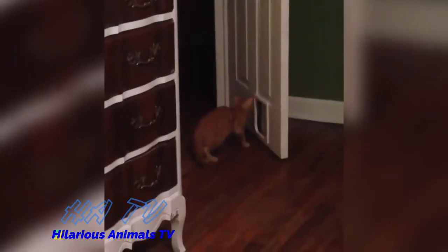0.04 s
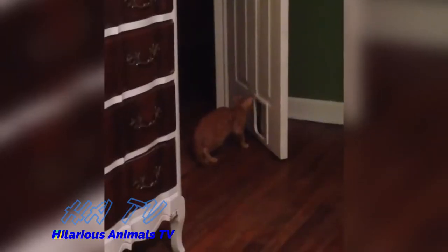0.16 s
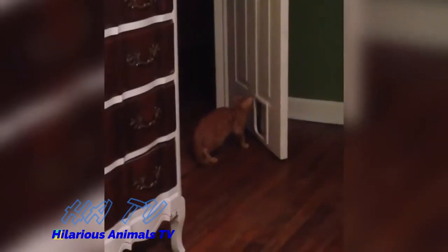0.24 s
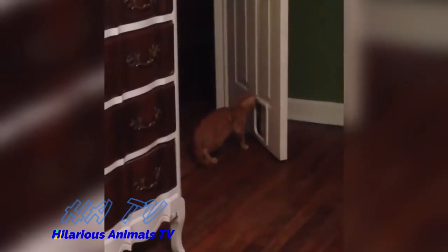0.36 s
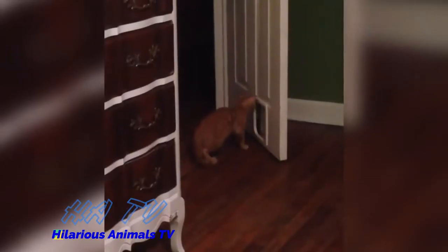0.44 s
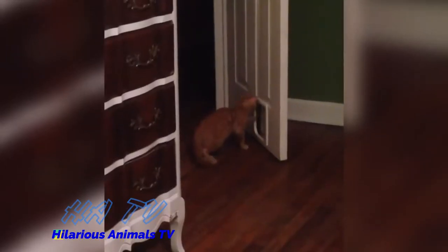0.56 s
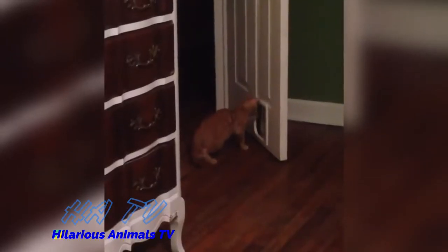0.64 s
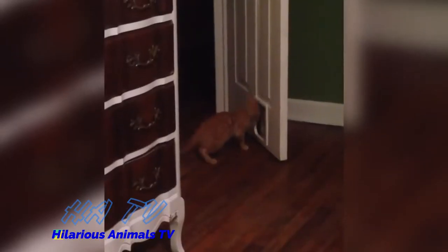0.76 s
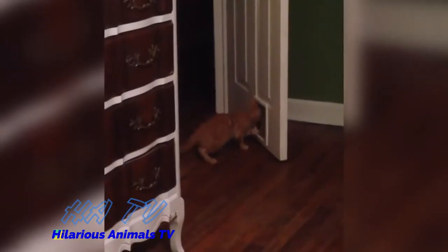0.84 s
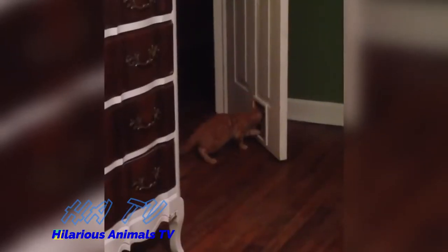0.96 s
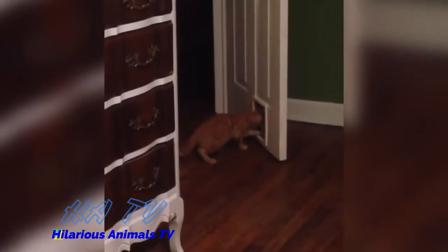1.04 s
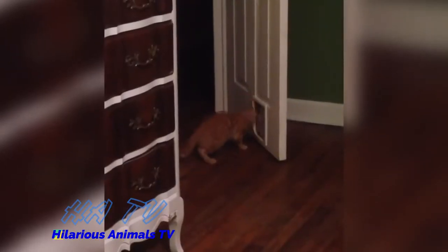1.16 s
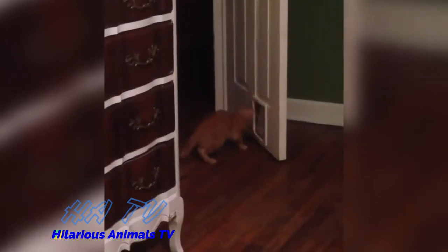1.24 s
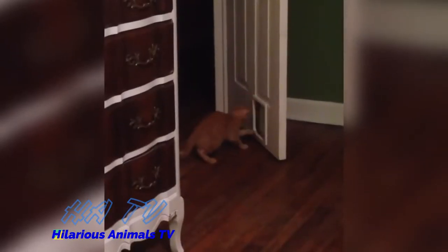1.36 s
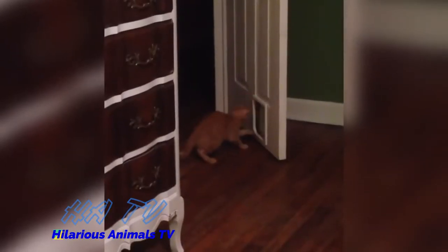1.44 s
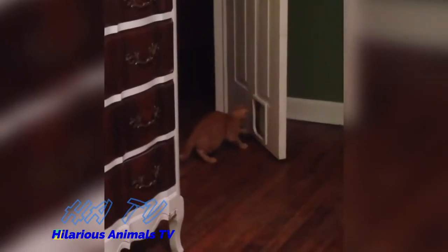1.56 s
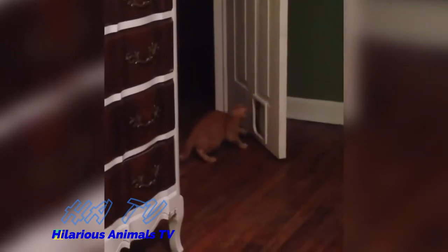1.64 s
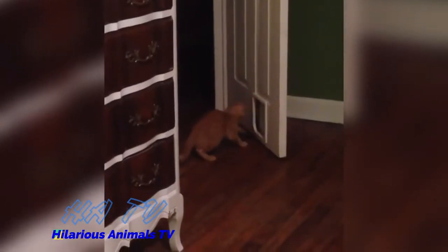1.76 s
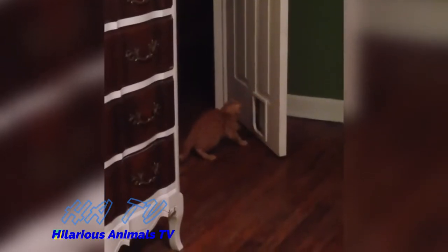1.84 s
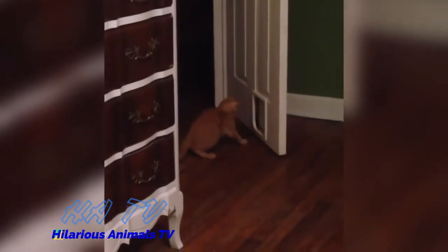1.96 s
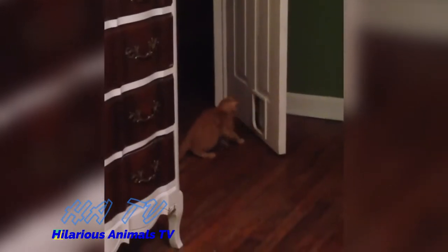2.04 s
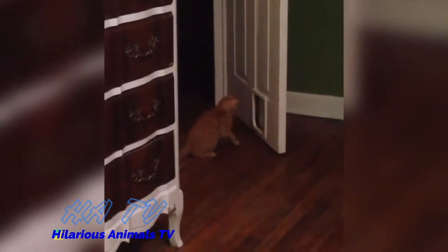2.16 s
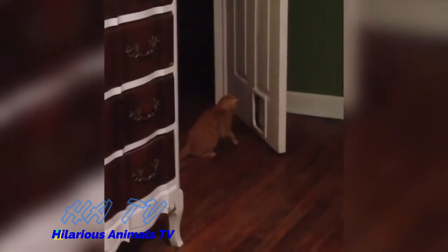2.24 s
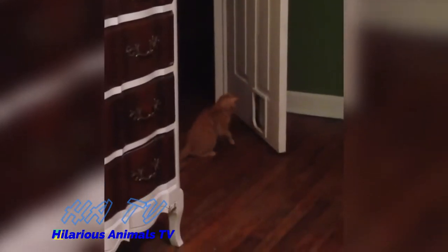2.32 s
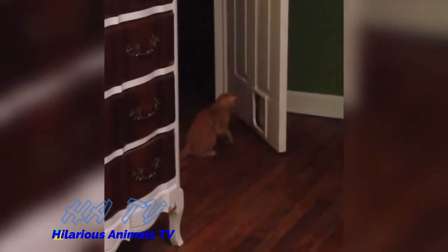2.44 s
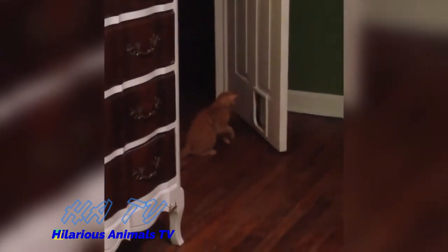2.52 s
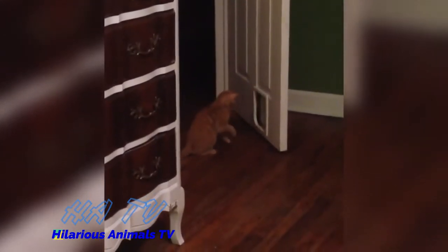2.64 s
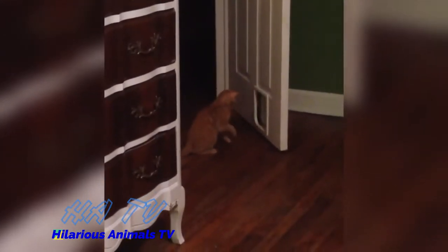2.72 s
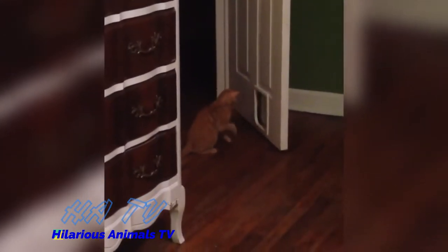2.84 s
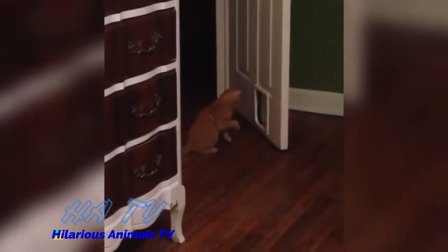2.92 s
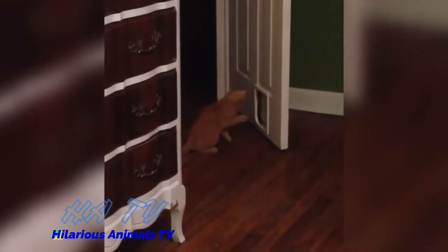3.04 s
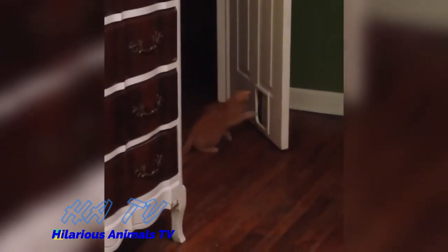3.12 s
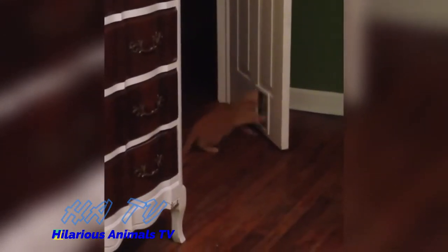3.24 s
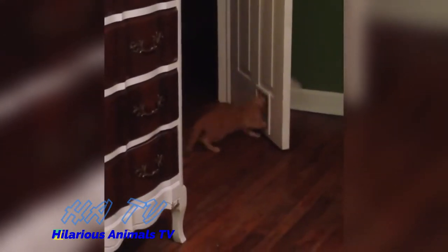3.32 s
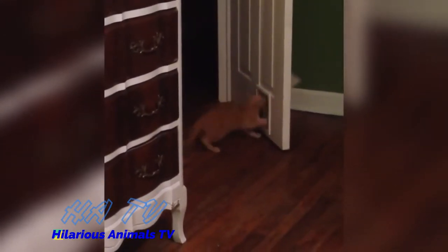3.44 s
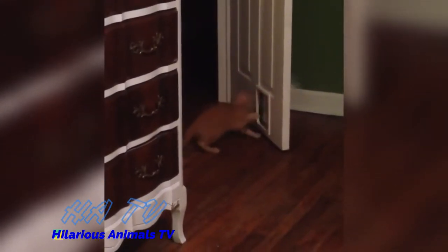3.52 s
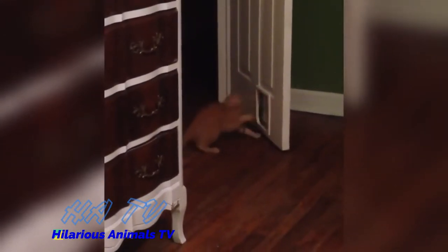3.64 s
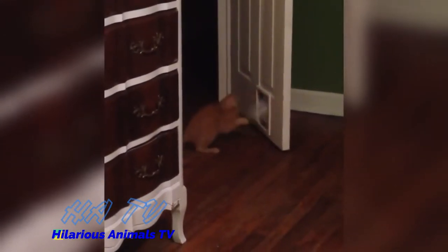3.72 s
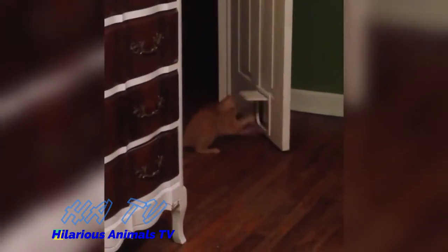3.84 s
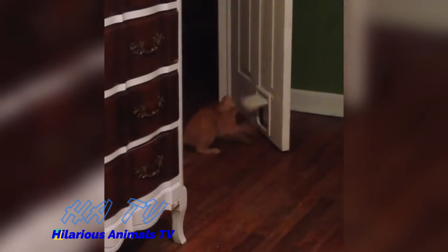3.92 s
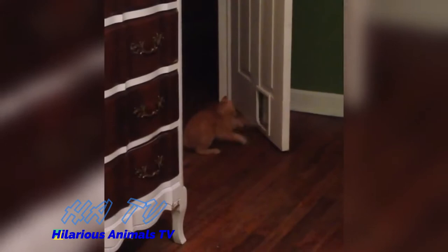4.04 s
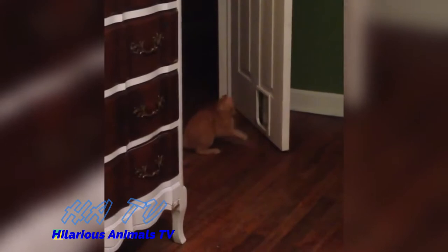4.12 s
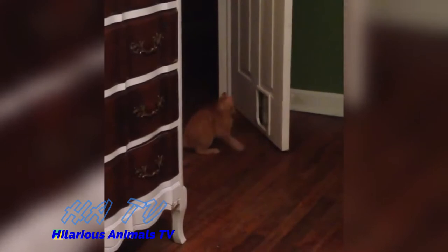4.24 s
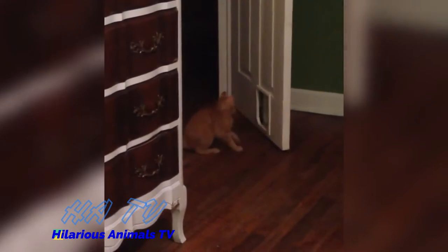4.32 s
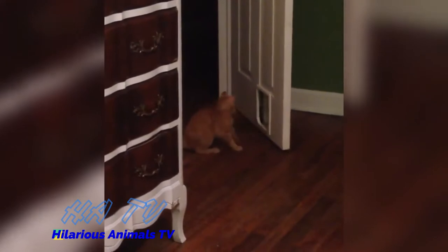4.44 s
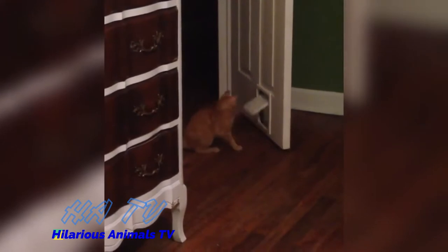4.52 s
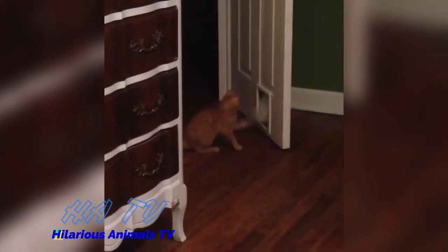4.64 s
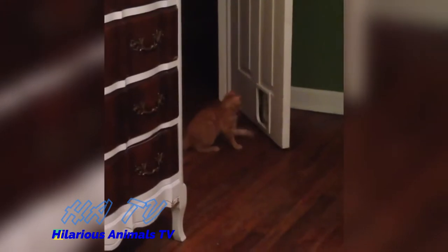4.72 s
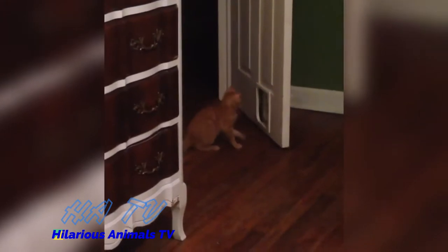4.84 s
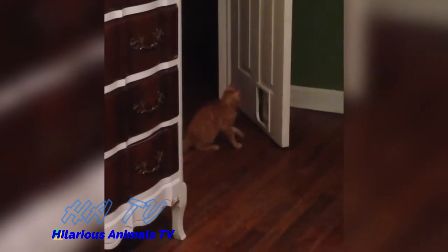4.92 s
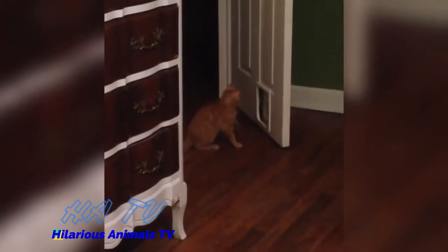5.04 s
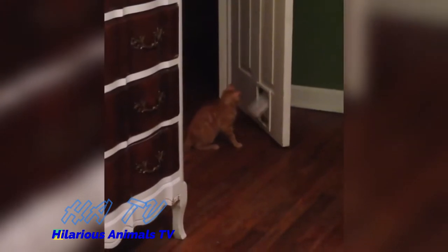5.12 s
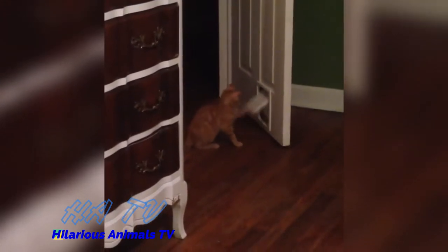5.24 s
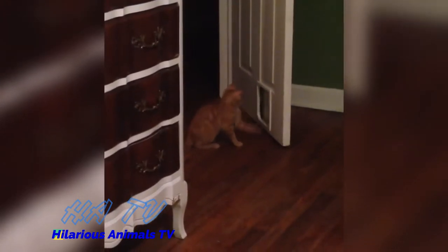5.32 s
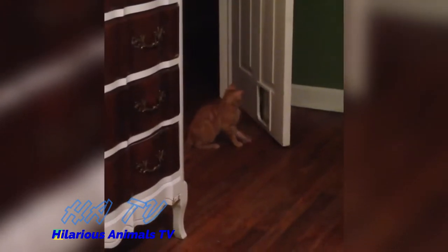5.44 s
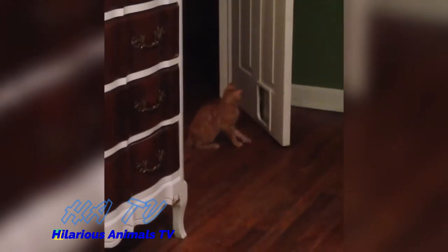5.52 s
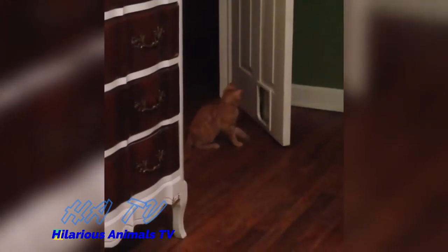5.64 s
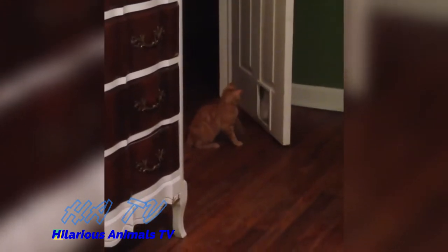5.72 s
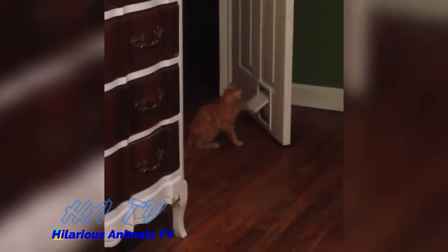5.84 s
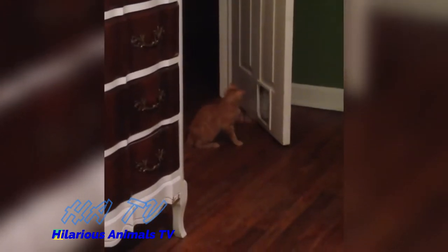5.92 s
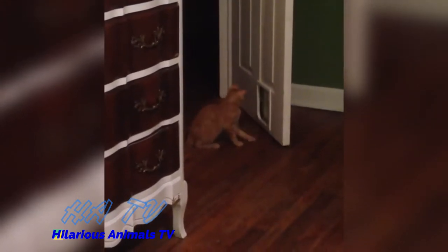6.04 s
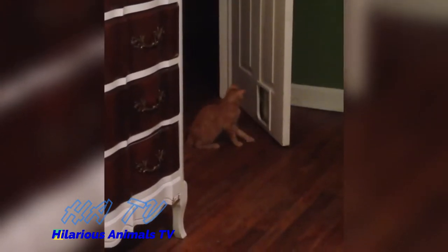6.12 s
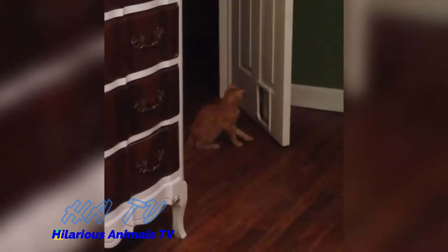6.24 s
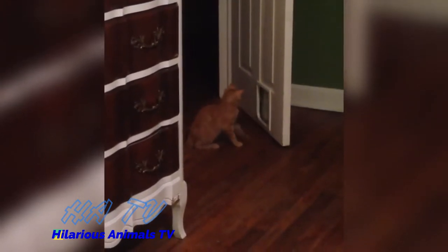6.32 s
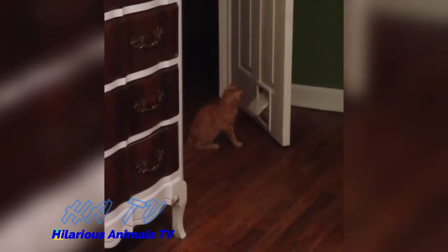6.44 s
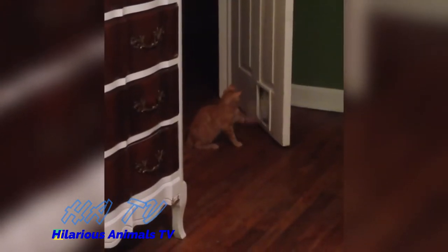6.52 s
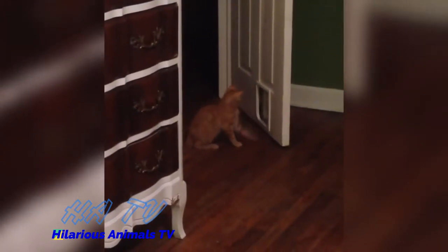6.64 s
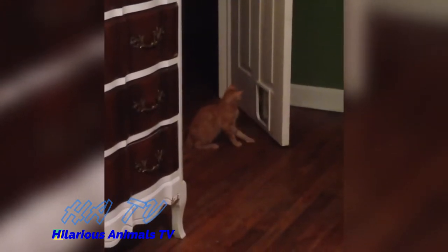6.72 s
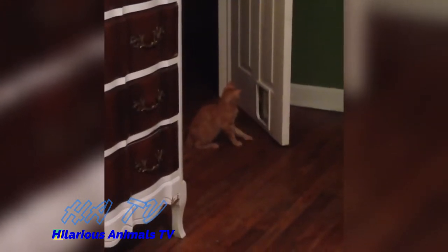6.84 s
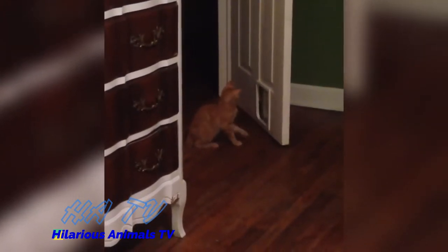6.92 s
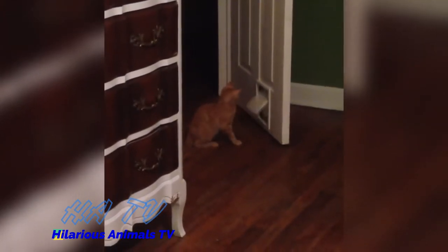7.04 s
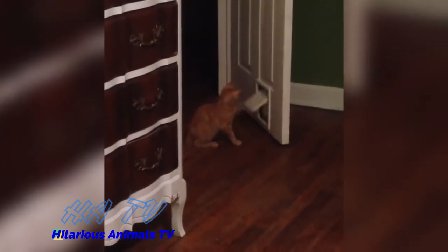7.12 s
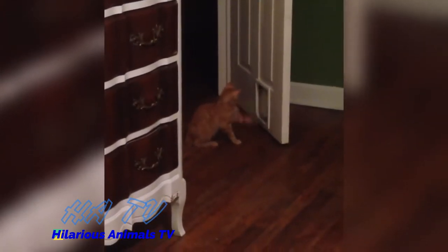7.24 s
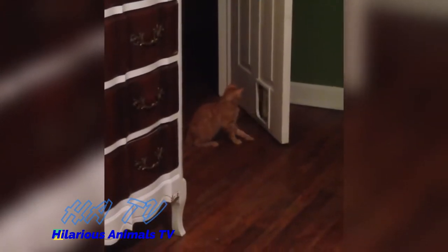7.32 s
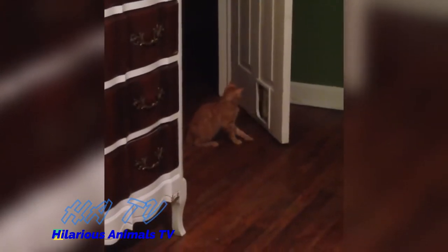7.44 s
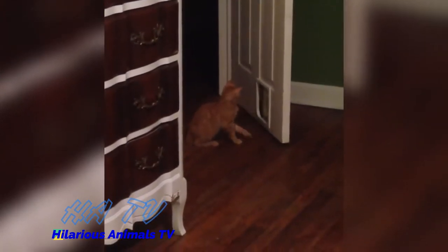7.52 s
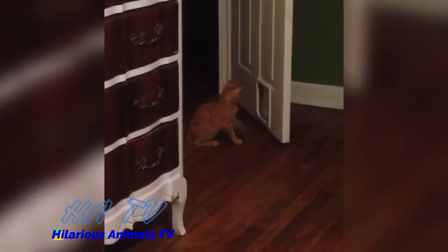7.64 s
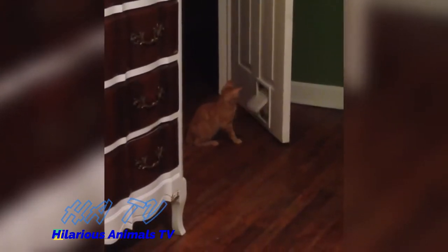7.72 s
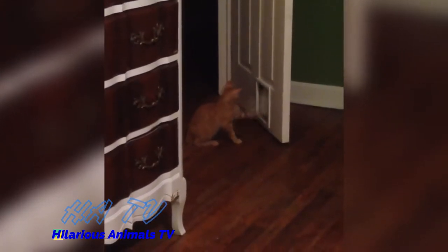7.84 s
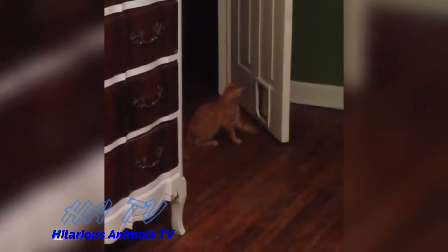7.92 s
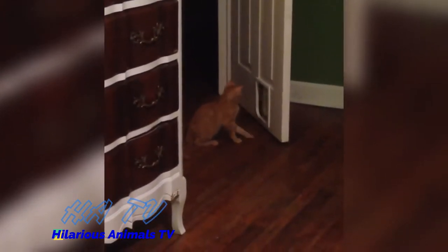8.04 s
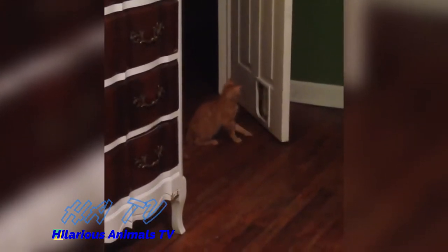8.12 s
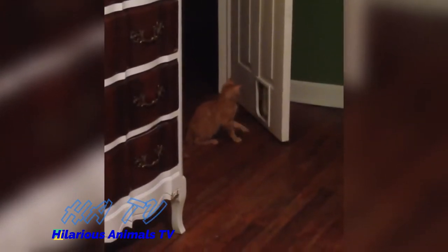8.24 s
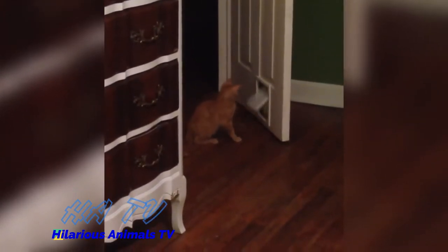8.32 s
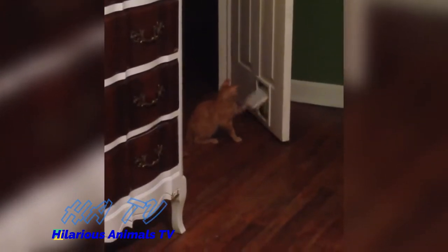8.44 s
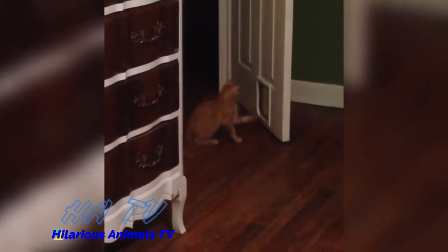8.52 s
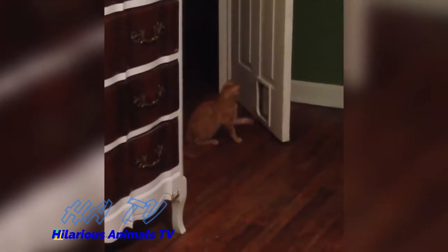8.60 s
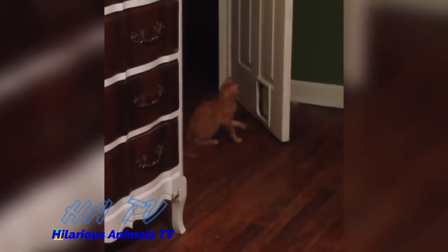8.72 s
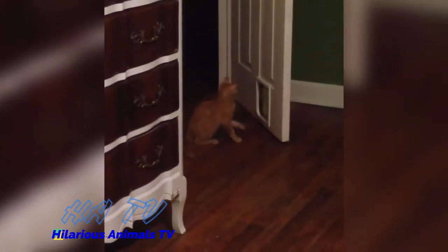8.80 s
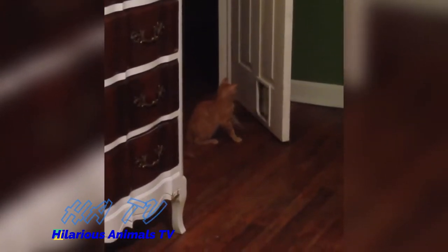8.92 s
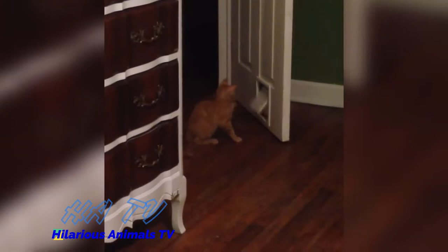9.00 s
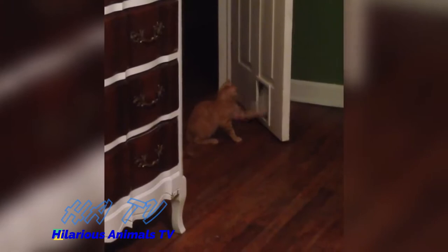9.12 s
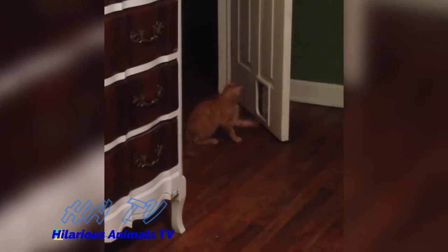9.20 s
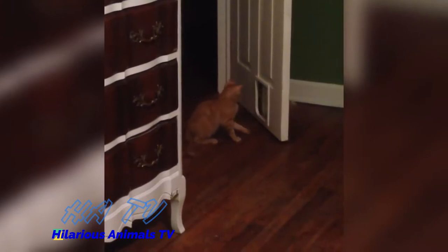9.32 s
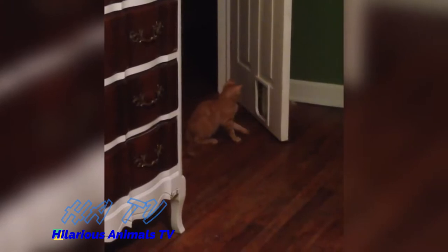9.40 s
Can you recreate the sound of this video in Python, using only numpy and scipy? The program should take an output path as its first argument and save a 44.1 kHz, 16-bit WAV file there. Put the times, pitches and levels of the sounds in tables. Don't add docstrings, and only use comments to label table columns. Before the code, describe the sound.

A bare room with low house rumble and faint hiss, heard by a phone a few metres from a hollow wooden door with a plastic pet flap. At about 0.75 s a soft paw touch and fur rustle; between 1.2 and 2.9 s, small dull ticks as the flap is nudged, faint rustling and barely audible hinge groans. At 3.27 s a sudden hard snap and hollow thump, with a rattling rap just after; around 3.7 s a clear squeaky creak and clack, then raps and a tick near 3.9 s and a snap at 4.12 s. From 4.5 s to 9.25 s, eight regular swings about 0.63 s apart: quick rising creak, light tick, soft booming paw thump roughly 0.15 s later, then a brighter ringing plastic snap 0.1 s after that. Thumps at 4.65 and 8.49 s are strongest. The last swing has a small groan instead of the run-up creak. Short room echoes follow each hit.

```python
import sys
import numpy as np
from scipy import signal
from scipy.fft import rfft, irfft, next_fast_len
from scipy.io import wavfile
from scipy.ndimage import uniform_filter1d

SR = 44100
rng = np.random.default_rng(int(sys.argv[2]) if len(sys.argv) > 2 else 0)


def makeup_ratio(level_db):
    decades = np.asarray(level_db, float) / 20
    return 10 ** decades


def output_pcm(signal):
    pcm = np.clip(np.atleast_2d(signal).T, -1, 1) * 32767
    wavfile.write(sys.argv[1], SR, np.round(pcm).astype(np.int16))


N = 417627
SPAN = 20480
HZ = np.fft.rfftfreq(SPAN, 1 / SR)
T = np.arange(SPAN) / SR


def unit(x):
    return x / np.sqrt(np.mean(x ** 2) + 1e-20)


def smooth(noise, samples):
    return unit(uniform_filter1d(noise, samples))


def along(points, hz):
    f, v = np.transpose(points)
    return np.interp(np.log(hz + 1), np.log(f + 1), v)


def causal(gain):
    cepstrum = irfft(np.log(np.maximum(gain, 1e-6)))
    cepstrum[1:SPAN // 2] *= 2
    cepstrum[SPAN // 2 + 1:] = 0
    return np.exp(rfft(cepstrum))


def shelves(low_db, low_hz, high_db, high_hz):
    low = low_db / (1 + (HZ / low_hz) ** 4)
    high = high_db / (1 + (high_hz / (HZ + 1)) ** 4)
    return makeup_ratio(low + high)


def body(tone, modes, scatter_db):
    lift = 0
    for centre_hz, width_hz, db in modes:
        strength = makeup_ratio(db + scatter_db * rng.standard_normal()) ** 2
        lift = lift + strength / (1 + (2 * (HZ - centre_hz) / width_hz) ** 2)
    treble_loss_db = 6 / (1 + (13300 / (HZ + 1)) ** 16)
    gain = makeup_ratio(along(tone, HZ) - treble_loss_db) * np.sqrt(1 + lift)
    return unit(gain)


# pitch_hz, t60_s
ROOM_DECAY = [(100, 0.32), (300, 0.49), (800, 0.39), (2000, 0.4), (5500, 0.39), (12000, 0.33)]


def tail(rise_s=0.00015, bass_lag=0):
    noise, knots = rng.standard_normal((2, SPAN))
    hz, t, z = signal.stft(noise, SR, nperseg=256)
    knots = np.resize(knots, z.shape)
    knots = smooth_grid(knots, 4, 4)
    hz = hz[:, None]
    build = 1 - np.exp(-(t + 1e-4) * (hz + 60) / (bass_lag + 1e-6))
    fade = makeup_ratio(-60 * t / along(ROOM_DECAY, hz)) + makeup_ratio(-12 - 60 * t / 0.16)
    echo = signal.istft(z * build * fade * makeup_ratio(3.3 * knots), SR, nperseg=256)[1][:SPAN]
    echo = echo * (1 - np.exp(-T / max(rise_s, 1e-4)))
    return echo / np.linalg.norm(echo)


def smooth_grid(noise, bands, frames):
    return unit(uniform_filter1d(uniform_filter1d(noise, bands, 0), frames, 1))


def room(spot, same, *shape):
    return rfft(np.sqrt(same) * spot + np.sqrt(1 - same) * tail(*shape))


def add(track, s, sound):
    part = track[round(s * SR):][:SPAN]
    part += sound[:len(part)]


def swell(s, db, rise_s, fall_s, edge_db, *steady):
    return [(s - rise_s, db + edge_db, *steady), (s, db, *steady), (s + fall_s, db + edge_db, *steady)]


def gate(rows):
    s, db, *more = np.transpose(rows)
    t = np.arange(s[0], s[-1], 1 / SR)
    fade = np.clip(np.minimum(t - s[0], s[-1] - t) / 0.0049, 0, 1)
    return t, fade * makeup_ratio(np.interp(t, s, db)), [np.interp(t, s, c) for c in more]


# pitch_hz, density_db (per Hz)
FLOOR_TONE = [(13, -63), (22, -46), (59, 2.5), (92, -11.5), (135, -1.5), (325, -16), (383, -10),
              (416, -16.5), (594, -12.5), (760, -18), (897, -14.5), (974, -21.5), (2040, -24.5),
              (5650, -25), (15600, -27.5)]


def floor():
    hz, t, z = signal.stft(rng.standard_normal(N + 4096), SR, nperseg=2048)
    patches = smooth_grid(rng.standard_normal(z.shape), 12, 5)
    hz = hz[:, None]
    z = z * makeup_ratio(along(FLOOR_TONE, hz) + 1.5 * patches / (1 + hz / 1500))
    return makeup_ratio(-63.5) * unit(signal.istft(z, SR, nperseg=2048)[1][:N])


# peak_s, peak_db, bright_part_db, rise_s, fall_s
RUSTLES = [(0.766, -61.5, -5, 0.038, .07), (0.86, -65.5, 9, .035, .09), (2.5, -66, -21, 0.041, .05),
           (2.6, -67, -18, .04, .05), (2.801, -66, -7, .09, 0.15), (2.955, -68.5, -13, 0.056, 0.1)]
# pitch_hz, density_db (per Hz)
TICK_TONE = [(180, -30), (480, -1.5), (1180, -7), (1280, -4), (1490, -6.5), (2440, -2.5), (2740, -7),
             (3810, -5.5), (11300, -5.5), (15500, -17)]


def rustle():
    out = np.zeros(N)
    for s, db, bright, rise_s, fall_s in RUSTLES:
        t, gain, (bright_db,) = gate(swell(s, db, rise_s, fall_s, -14, bright))
        dull, fine, clump = rng.standard_normal((3, len(t)))
        gain = gain * makeup_ratio(1.6 * smooth(clump, 300))
        low = rfft(gain * dull, SPAN) * shelves(0, 1000, -29, 5100) * makeup_ratio(5.5)
        high = rfft(gain * makeup_ratio(bright_db) * fine, SPAN) * shelves(-10.5, 2600, 0, 5000)
        scratches = (low + high) * body(TICK_TONE, [], 0)
        add(out, t[0], makeup_ratio(-0.5) * irfft(scratches * (1 + makeup_ratio(-6.5) * rfft(tail()))))
    return out


# peak_s, peak_db, slip_rate_hz, rise_s, fall_s
GROANS = [(1.9, -61, 403, 0.034, 0.033), (2.686, -59.5, 437, 0.017, 0.081), (2.82, -62, 395, 0.012, 0.099),
          (3.615, -54.5, 493, .015, .07), (3.684, -39.5, 456.5, 0.032, .03),
          (3.712, -36, 590.5, .025, 0.049), (3.77, -46, 462, .03, .035), (8.872, -49, 446, .045, 0.036),
          (8.911, -49.5, 488, 0.014, 0.014), (8.93, -48.5, 451, 0.022, .03)]
# tick_s, peak_db
SWINGS = [(4.4963, -43), (5.1216, -43.5), (5.7516, -44.5), (6.3939, -44.5), (7.0235, -44), (7.6818, -44),
          (8.32, -44), (8.972, -45)]


def strokes():
    spans = []
    for s, db, slip_hz, rise_s, fall_s in GROANS:
        spans.append(swell(s, db, rise_s, fall_s, -16.5, slip_hz, -9.5, -7))
    for s, _ in SWINGS[:-1]:
        spans.append([(s - 0.12, -71, 482, -14, -7), (s, -60.5, 570, -2, 0)])
    return spans


# pitch_hz, density_db (per Hz)
RUB_TONE = [(150, -48), (250, -10), (584, -6.5), (794, -16.5), (982, -4.5), (1440, -41), (2500, -20),
            (3250, -65), (5500, -120)]
# pitch_hz, width_hz, lift_db
DOOR = [(187, 150, 3.1), (245, 97, 2.5), (347.6, 9.3, 13), (446, 113, 9), (515, 52, 3.9), (580, 62, 5.4),
        (673, 62, 6.1), (763, 25, 4.4)]


def hinge():
    out = np.zeros(N)
    for rows in strokes():
        t, gain, (slip_hz, upper_db, rub_db) = gate(rows)
        jitter, lumps, rub, rasp = rng.standard_normal((4, len(t)))
        phase = 2 * np.pi * np.cumsum(slip_hz * (1 + 0.055 * smooth(jitter, 200))) / SR
        slips = unit(np.sin(phase) * makeup_ratio(2.9 * smooth(lumps, 400)))
        rub = unit(irfft(rfft(rub, SPAN) * body(RUB_TONE, DOOR, 0.79))[:len(t)])
        upper = np.sin(2 * phase) * (1 + 0.82 * smooth(rasp, 70))
        creak = slips + makeup_ratio(rub_db) * rub + makeup_ratio(upper_db - 5.5) * upper
        echoes = 1 + makeup_ratio(-13) * rfft(tail())
        add(out, t[0], makeup_ratio(-2.5) * irfft(rfft(gain * creak, SPAN) * echoes))
    return out


# start_s, peak_db, boom_db, scuff_db, scuff_lead_s
PAWS = [(0.753, -56, -16.5, -21, 0.0085), (3.274, -38.5, -11, -7.5, 0.003), (4.647, -31, -13, -11.5, 0.003),
        (5.287, -38.5, -16.5, -4.5, 0.0047), (5.938, -37.5, -14, -21.5, 0.011),
        (6.572, -35, -14.5, -14, 0.0047), (7.229, -36, -17, -20.5, 0.0047),
        (7.871, -37.5, -16, -17.5, 0.0066), (8.488, -29.5, -18, -21, 0.0063),
        (9.171, -39.5, -8.5, -12.5, 0.012)]
# start_s, peak_db, boom_db, scuff_db, scuff_lead_s
RAPS = [(3.328, -42, -14.5, -30, 0.007), (3.364, -62, -15, -23, 0.0072), (3.888, -43, -25, -20, 0.002),
        (4.172, -56, -19.5, -30, 0.002)]
# pitch_hz, density_db (per Hz)
PAW_TONE = [(29, -50), (50, -16), (95, 5), (237, -0.5), (308, 1.5), (602, -4), (795, -5), (1080, -11.5),
            (1580, -18), (2500, -24.5), (3250, -29), (5500, -120)]
# pitch_hz, level_db, time_to_peak_s
PANEL = [(138.8, -5, 0.034), (184.8, -2, 0.03), (236.3, 3.5, 0.017), (371.5, 0, 0.016), (444.7, -4, 0.031)]
# pitch_hz, density_db (per Hz)
SCUFF_TONE = [(590, -83), (1000, -11), (2080, -6.5), (2360, -1), (2680, -8.5), (3610, -7), (11000, -4.5),
              (15500, -11)]
# pitch_hz, width_hz, lift_db
FLAP_IN = [(797, 215, 7.5), (995, 23, 7.5), (1255, 51, 7), (1840, 45, 3), (2230, 59, -3), (3650, 680, 3)]


def paws():
    out, spot = np.zeros(N), tail(0.0074, 4.0)
    blows = [(*row, 0.016) for row in PAWS]
    blows += [(*row, 0.0027) for row in RAPS]
    for s, db, boom_db, scuff_db, lead_s, contact_s in blows:
        wood = causal(body(PAW_TONE, DOOR, 0.79) * shelves(boom_db + 8, 375, 0, 5000))
        add(out, s - 0.002, makeup_ratio(db + 33.5) * irfft(wood * room(spot, 0.35, contact_s, 1.23)))
        for hz, mode_db, peak_s in PANEL:
            size, turn = rng.standard_normal(2)
            swelling = (T / peak_s * np.exp(1 - T / peak_s)) ** 1.65
            level = makeup_ratio(db + 0.77 * boom_db + mode_db + 2.3 * size)
            add(out, s, level * swelling * np.sin(2 * np.pi * hz * T + turn))
        pad = causal(body(SCUFF_TONE, FLAP_IN, 1.5) * shelves(3.9, 2300, 0, 5000))
        add(out, s - lead_s, makeup_ratio(db + scuff_db + 31.5) * irfft(pad * rfft(tail(0.0082))))
    return out


def clicks(events, tone, modes, ring, walls, gain_db, low_db, bright_db, direct_db, ring_db, same):
    out, spot = np.zeros(N), tail()
    early = 1
    for delay_s, db in walls:
        early = early + makeup_ratio(db) * np.exp(-2j * np.pi * HZ * delay_s)
    for s, db, low, bright in events:
        knock = np.zeros(SPAN)
        for hz, mode_db, t60_s in ring:
            decay = makeup_ratio(mode_db + 0.91 * rng.standard_normal() - 60 * T / t60_s)
            knock += decay * np.sin(2 * np.pi * hz * T)
        knock *= 1 - np.exp(-T / 0.0038)
        edge = causal(body(tone, modes, 0.41)) * (makeup_ratio(direct_db) * early + room(spot, same))
        tilt = causal(shelves(low + low_db, 1320, bright + bright_db, 4250))
        click = tilt * (makeup_ratio(gain_db) * edge + makeup_ratio(ring_db) * rfft(knock))
        add(out, s, makeup_ratio(db) * irfft(click))
    return out


# start_s, peak_db, low_db, bright_db
TICKS = [(1.1704, -49, -11.5, -36), (1.475, -46.5, -15, -16.5), (1.8322, -60, -6, -20),
         (2.0914, -48, -15, -15.5), (2.576, -52.5, -16, -34), (2.7313, -56, -10, -23),
         (2.8015, -61.5, -3, -10), (2.8529, -55.5, -12, -38), (3.894, -39.5, -45, -41)]
# pitch_hz, level_db, t60_s
RING_IN = [(790, -7, .06), (1285, -6, .12), (2255, 2, .07), (2430, -4, .09), (3750, -6, .08),
           (4050, -8, .05)]
# delay_s, level_db
WALLS_IN = [(.0024, -4), (.0056, 0), (.0101, -2), (.017, -8)]


def ticks():
    swings = [(s, db, -9, -11) for s, db in SWINGS]
    return clicks(TICKS + swings, TICK_TONE, FLAP_IN, RING_IN, WALLS_IN, gain_db=29, low_db=9.0,
                  bright_db=7, direct_db=-21, ring_db=-2, same=0.8)


# start_s, peak_db, low_db, bright_db
SNAPS = [(3.266, -28, -3, -15.5), (3.747, -40.5, 7, 5.5), (4.1224, -34, -5.5, -4.5),
         (4.7558, -35.5, -5, -1.5), (5.3878, -35, 0, -3), (6.0318, -37, 0, -1), (6.6595, -35, 1, -2),
         (7.3205, -35.5, -1.5, -3), (7.9535, -35.5, -5.5, -1.5), (8.6174, -34.5, -11, -3),
         (9.2545, -36.5, -6, -2.5)]
# pitch_hz, density_db (per Hz)
SNAP_TONE = [(410, -25), (700, -3.5), (1090, -9), (1320, -4.5), (2030, -6), (2280, -7), (2490, -7.5),
             (5360, -14.5), (11100, -14), (15500, -28)]
# pitch_hz, width_hz, lift_db
FLAP_OUT = [(1870, 14, 5.3), (2116, 26, 2), (2500, 52, 6.8), (3130, 91, 2.7), (3480, 140, 5),
            (4530, 320, 2), (6430, 330, 5.1)]
# pitch_hz, level_db, t60_s
RING_OUT = [(1822, -5, .14), (2020, -4, 0.14), (2964, -10, 0.14), (3327, -1.5, 0.055), (4130, 1, 0.045),
            (6640, -16, 0.026), (10700, 11, 0.0093)]
# delay_s, level_db
WALLS_OUT = [(.0025, -3), (.0058, -3), (.0103, -3), (.0172, -8)]


def snaps():
    return clicks(SNAPS, SNAP_TONE, FLAP_OUT, RING_OUT, WALLS_OUT, gain_db=22.5, low_db=-4.5,
                  bright_db=2.5, direct_db=-17, ring_db=-8, same=0.3)


def scene():
    return (floor() + rustle() + hinge() + paws() + ticks() + snaps())[None]


def band_limit(x):
    return signal.sosfilt(signal.butter(12, 16330, fs=SR, output="sos"), x)


def record(dry):
    size = next_fast_len(N)
    passed = np.fft.rfftfreq(size, 1 / SR) < 15400
    mix = irfft(rfft(dry, size) * passed, size)[:, :N]
    return band_limit(mix)


dry = scene()
out = record(dry)
output_pcm(out)
```